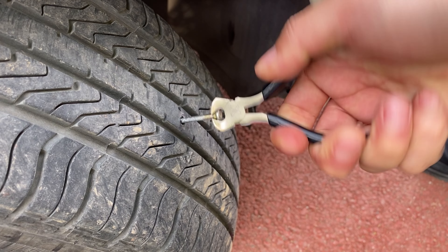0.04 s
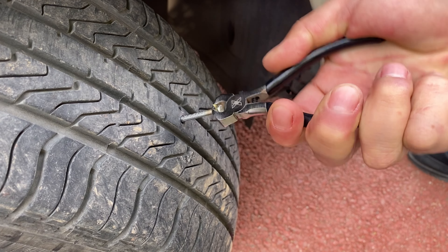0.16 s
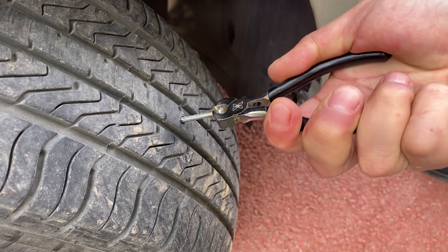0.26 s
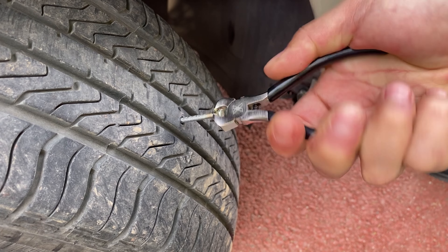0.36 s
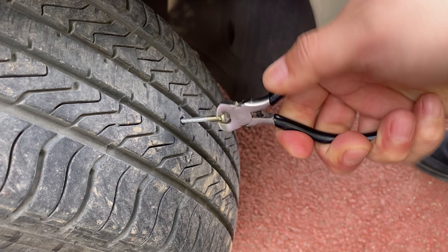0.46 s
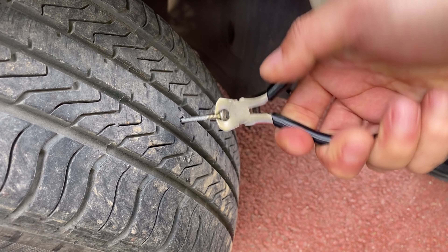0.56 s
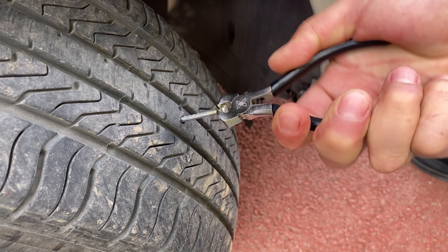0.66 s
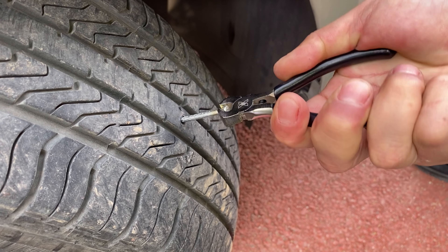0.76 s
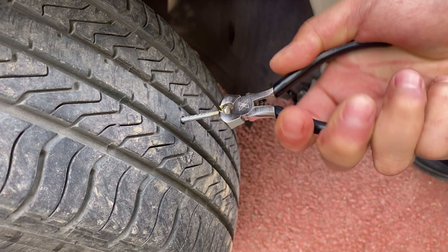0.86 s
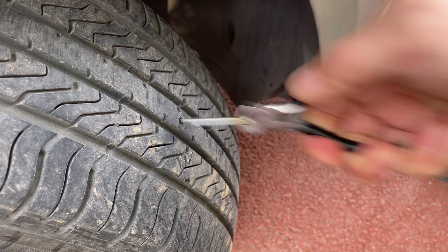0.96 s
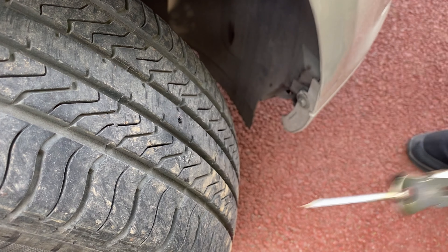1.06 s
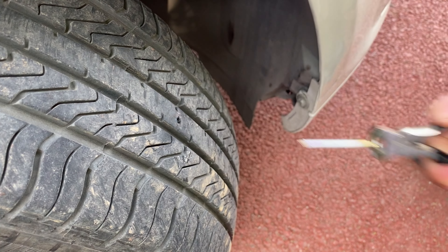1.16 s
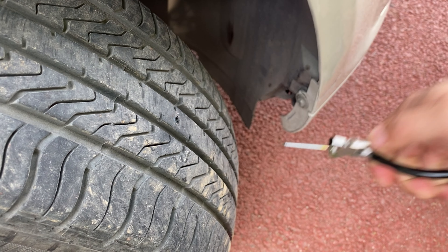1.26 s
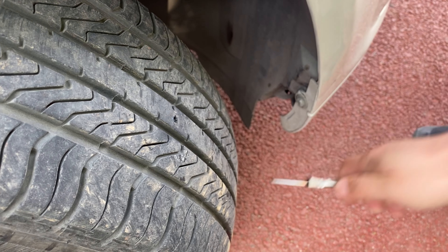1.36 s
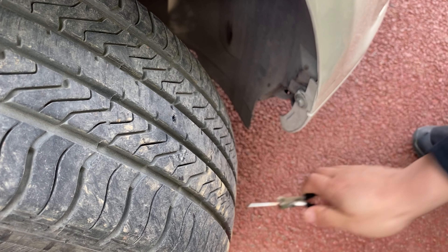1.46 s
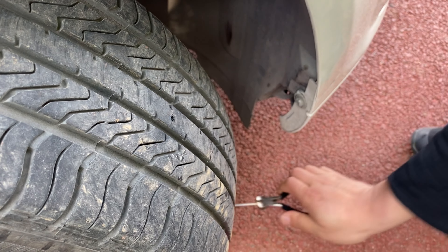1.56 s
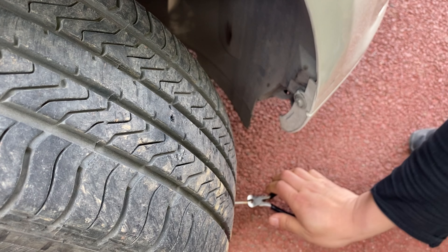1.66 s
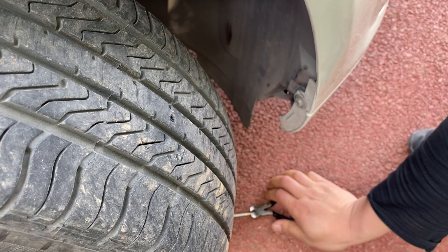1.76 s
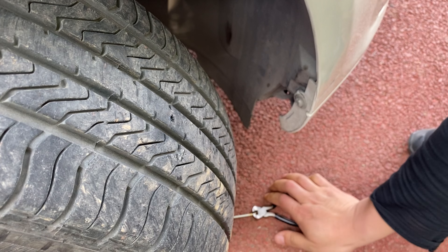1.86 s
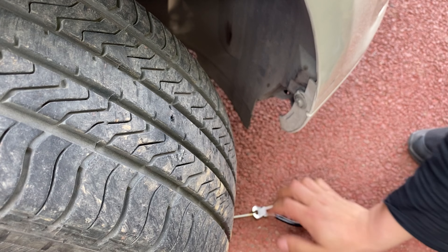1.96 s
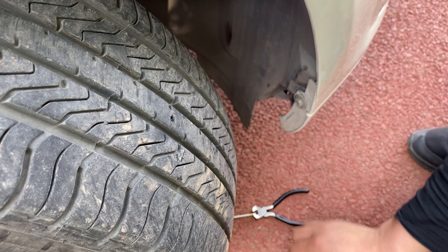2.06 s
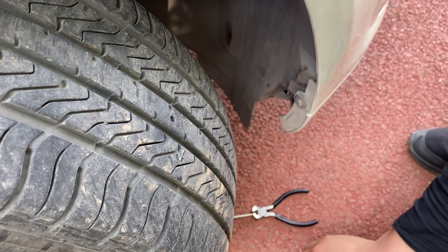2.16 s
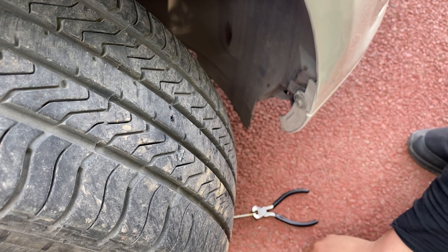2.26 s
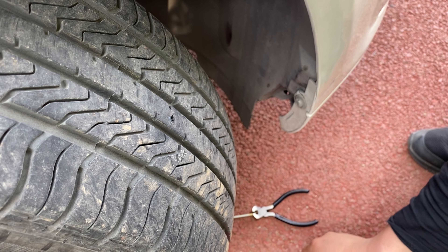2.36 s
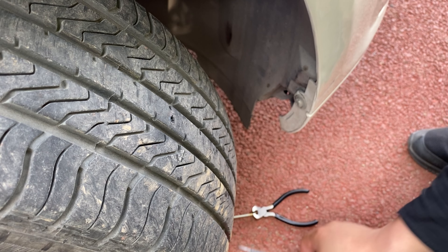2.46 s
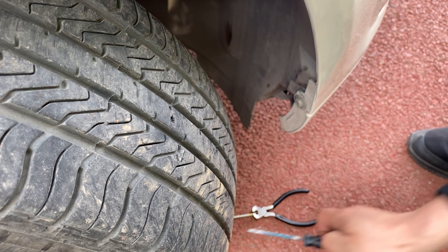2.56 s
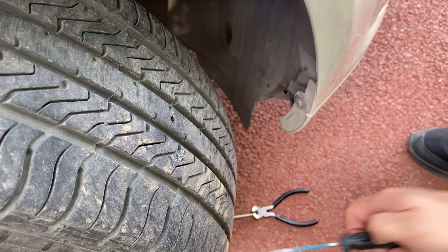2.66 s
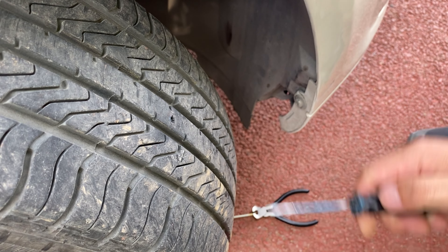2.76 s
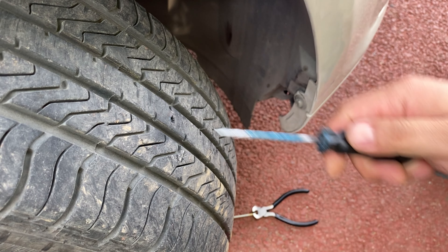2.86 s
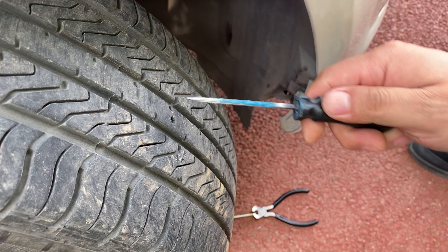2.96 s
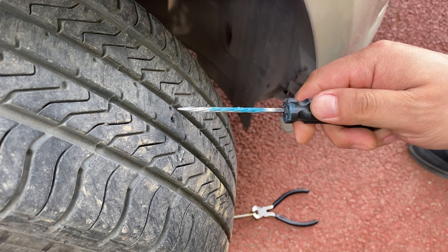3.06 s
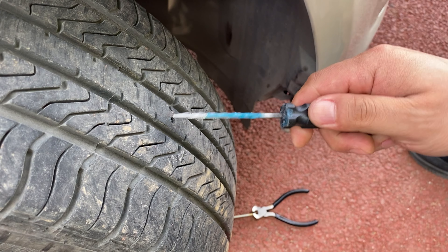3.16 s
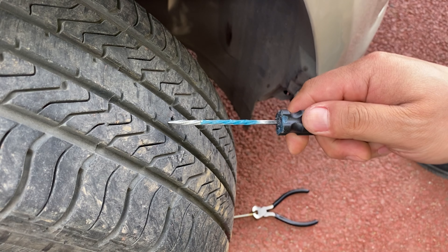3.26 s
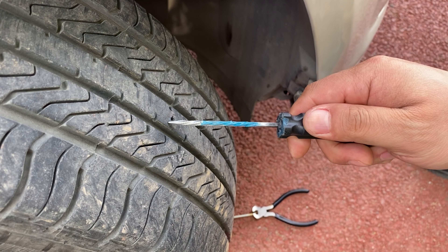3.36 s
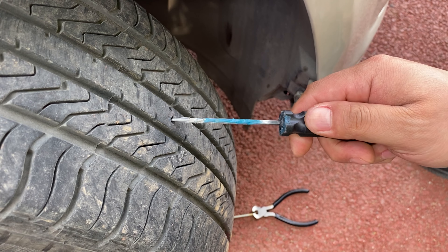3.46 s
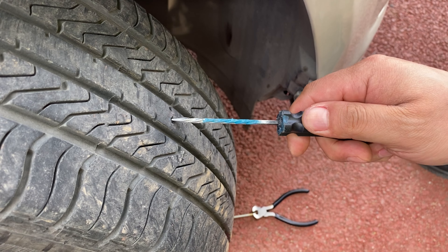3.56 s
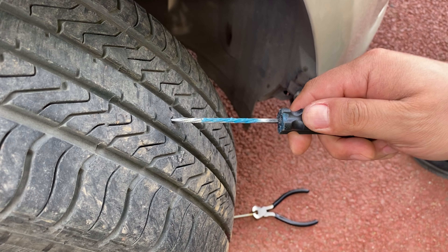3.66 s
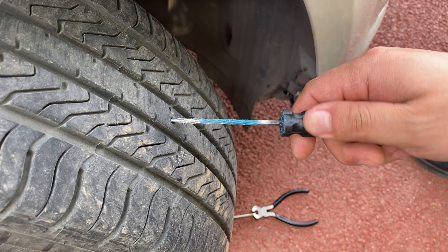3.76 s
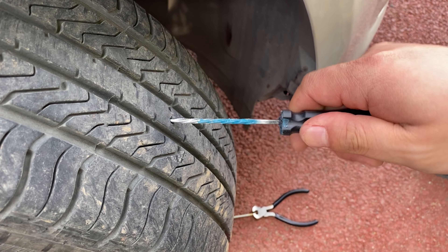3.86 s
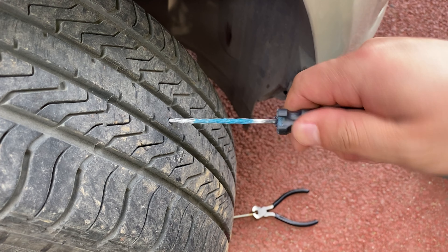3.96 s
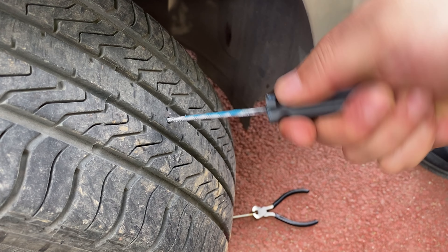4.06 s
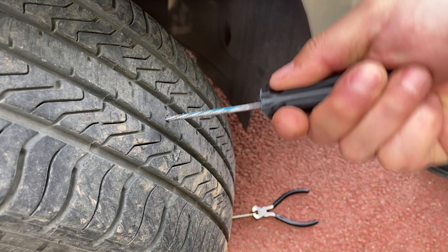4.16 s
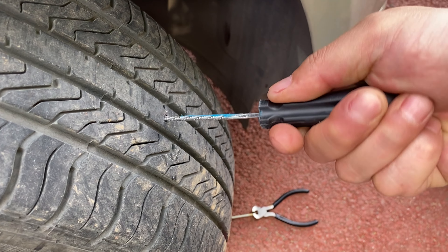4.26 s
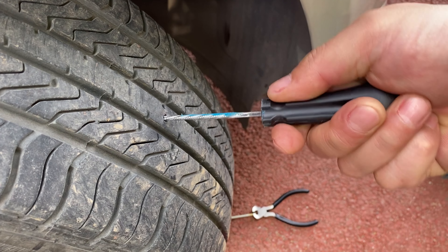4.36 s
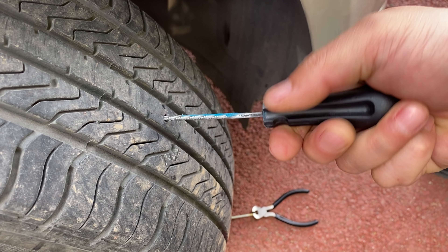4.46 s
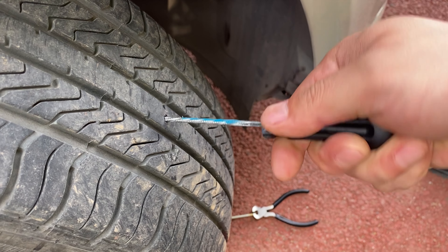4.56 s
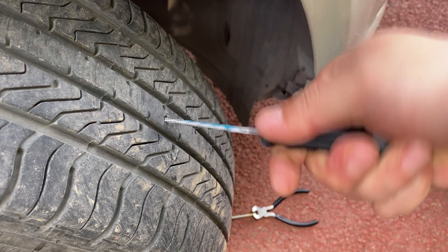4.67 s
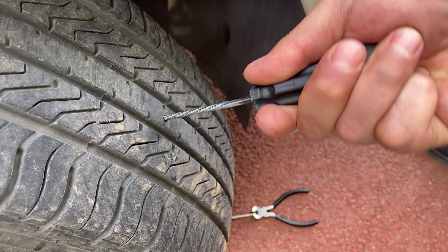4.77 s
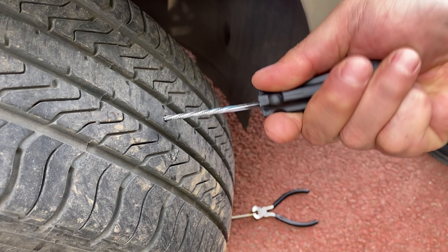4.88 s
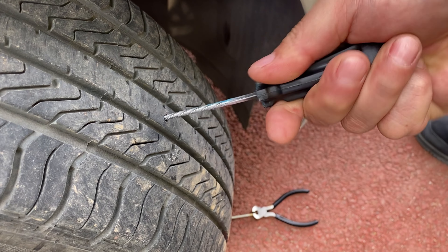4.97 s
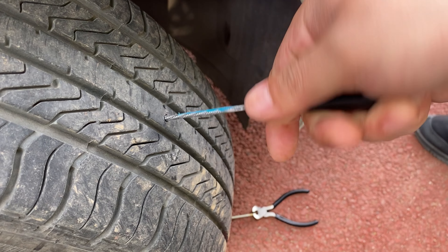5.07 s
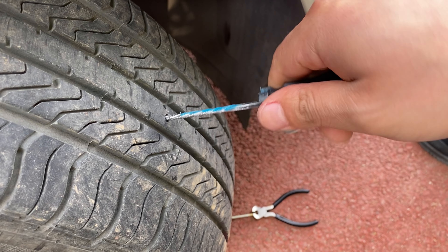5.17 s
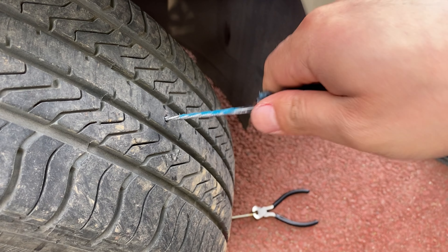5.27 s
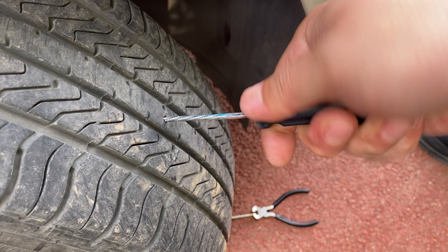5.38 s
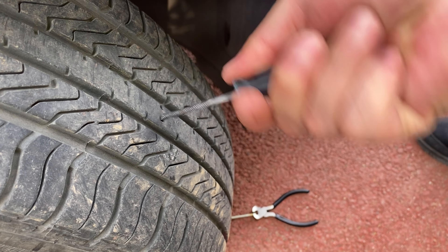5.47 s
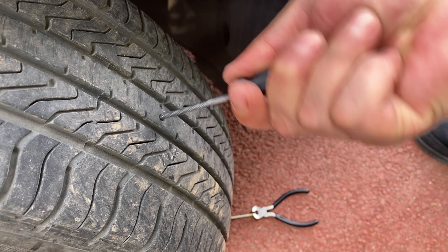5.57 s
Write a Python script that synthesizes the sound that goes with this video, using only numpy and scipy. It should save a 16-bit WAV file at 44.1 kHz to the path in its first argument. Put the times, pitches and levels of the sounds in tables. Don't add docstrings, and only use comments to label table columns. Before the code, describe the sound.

A tyre screw is worked loose with small steel clicks against quiet street rumble and faint bird and insect notes. A hard snap releases a piercing jet of air that slowly eases. A rasp swipes through it, making it flare, then pushes in; the hiss dies with gusts buffeting the close stereo microphone. Quiet twisting scrapes, clicks and little puffs of leaking air end it.

```python
import sys
import numpy as np
from scipy import signal
from scipy.fft import rfft, irfft
from scipy.io import wavfile

SR = 44100
rng = np.random.default_rng(int(sys.argv[2]) if len(sys.argv) > 2 else 0)


def decibels_to_gain(level_db):
    exponent = np.asarray(level_db, float) / 20
    return 10 ** exponent


def pcm_store(signal):
    levels = np.round(np.clip(np.atleast_2d(signal), -1, 1) * 32767)
    wavfile.write(sys.argv[1], SR, levels.astype(np.int16).T)


N = 247842

# time_s, level_db
STREET_DB = [(0, -54.5), (.7, -53), (1.1, -52.5), (1.8, -57), (3.8, -59), (4.3, -59), (4.7, -62.5),
             (5.2, -57), (5.62, -58.5)]
# freq_hz, correlation
STREET_CORRELATION = [(30, 1), (110, 0.86), (200, 0.79), (380, .5), (700, -0.49), (1300, 0.52),
                      (2400, 0.21), (4400, -0.15)]
# freq_hz, correlation
AIR_CORRELATION = [(200, 1), (500, 0.7), (800, 0.14), (1200, 0.64), (1800, .6), (2700, .65), (4200, 0.33),
                   (6000, 0.86)]


def unit(x):
    return x / np.sqrt(np.mean(x ** 2) + 1e-20)


def in_time(points):
    time_s, level_db = np.transpose(points)
    return np.interp(np.arange(N) / SR, time_s, level_db)


def at_hz(points, hz):
    point_hz, value = np.transpose(points)
    return np.interp(np.log(hz), np.log(point_hz), value)


def drift(rate_hz):
    pole = np.exp(-20 * np.pi * rate_hz / SR)
    noise = rng.standard_normal(N // 10 + 4002)
    slow = signal.lfilter([1], [1, -2 * pole, pole * pole], noise)[4000:]
    return np.interp(np.arange(N) / 10, np.arange(len(slow)), unit(slow))


def ring(drive, hz, t60_s):
    r, w = decibels_to_gain(-60 / (t60_s * SR)), 2 * np.pi * hz / SR
    return signal.lfilter([0, np.sin(w)], [1, -2 * r * np.cos(w), r * r], drive + 1e-18)


def decay(clicks, t60_s):
    return signal.lfilter([1], [1, -decibels_to_gain(-60 / (t60_s * SR))], clicks + 1e-18)


def coloured(spectrum, correlation):
    hz = np.maximum(np.arange(N // 2 + 1) * SR / N, 1)
    mid, side = rfft(rng.standard_normal((2, N)))
    alike = np.clip(at_hz(correlation, hz), -1, 1)
    inside = (hz > spectrum[0][0]) & (hz < spectrum[-1][0])
    pair = np.sqrt(1 + alike) * mid + np.sqrt(1 - alike) * side * [[1], [-1]]
    return unit(irfft(pair * decibels_to_gain(at_hz(spectrum, hz)) * inside, N))


def swell(start_s, end_s, edge_s):
    t = np.arange(N) / SR
    return np.clip(np.minimum(t - start_s, end_s - t) / edge_s, 0, 1)


def street():
    # freq_hz, density_db
    rumble_spectrum = [(12, -45), (20, -29.5), (42, -0.5), (65, 4), (137, -4.5), (167, -13), (231, -30.5),
                       (285, -22), (320, -46.5), (420, -64), (700, -120)]
    # freq_hz, density_db
    wash_spectrum = [(120, -20), (200, -2), (282, -7), (337, -11), (730, -12.5), (2260, -32.5),
                     (3530, -35.5), (4680, -49), (7000, -45.5), (9100, -65), (15400, -120)]
    # start_s, end_s, edge_s, change_db
    lull = (4.35, 4.9, .07, -10.5)
    # time_s, rise_db, half_length_s
    rumble_swells = [(.04, 4, 0.031), (0.244, 5.5, 0.11), (0.414, 4, 0.17), (0.727, 7.5, 0.089),
                     (1.35, 2.5, 0.043), (1.49, 4.5, 0.056), (1.806, 15, 0.16), (1.993, 5, 0.1),
                     (2.2, 6, 0.18), (2.328, 6.5, 0.086), (2.49, 12, 0.14), (2.834, 1.5, 0.065),
                     (3.331, 6, 0.18), (3.65, 6.5, 0.097), (4.309, 0.5, 0.063), (4.719, 9, .09),
                     (4.87, 4.5, 0.091), (5.004, 3, .1), (5.147, 2.5, .08), (5.49, 6, 0.058),
                     (5.58, 1, 0.066)]
    rumble_over_wash_db = 10
    calmer_s, calmer_db = 4.12, -3.5

    start_s, end_s, edge_s, lull_db = lull
    wash_db = in_time(STREET_DB)
    rumble_db = wash_db + rumble_over_wash_db
    rumble_db = rumble_db + lull_db * swell(start_s, end_s, edge_s)
    rumble_db = rumble_db + calmer_db * swell(calmer_s, N, edge_s)
    for time_s, rise_db, half_s in rumble_swells:
        rumble_db = rumble_db + rise_db * swell(time_s - half_s, time_s + half_s, half_s)
    rumble = decibels_to_gain(rumble_db + 2.04 * drift(15)) * coloured(rumble_spectrum, STREET_CORRELATION)
    wash = decibels_to_gain(wash_db - 1.0 + 0.7 * drift(12)) * coloured(wash_spectrum, STREET_CORRELATION)
    return rumble + wash


def hum():
    # freq_hz, level_db
    hum_lines = [(290, -64.5), (740, -69), (1150, -75.5), (1700, -84), (2200, -86)]
    out = np.zeros((2, N))
    for hz, level_db in hum_lines:
        out += decibels_to_gain(level_db) * unit(ring(rng.standard_normal((2, N)), hz, 0.3))
    return decibels_to_gain(in_time(STREET_DB) + 55) * out


def songs():
    # start_s, end_s, level_db, first_hz, last_hz
    calls = [
        (0.113, 0.693, -77, 8400, 7700),
        (.38, 0.462, -86, 7100, 6900),
        (.04, 0.13, -77, 4000, 3750),
        (0.201, 0.328, -79, 3450, 3900),
        (.77, 0.803, -68, 3200, 3090),
        (0.798, 0.842, -75, 4100, 4200),
        (4.098, 4.3, -83, 7970, 7500),
        (4.136, 4.392, -78, 1714, 1684),
        (5.25, 5.358, -80, 8300, 8200),
    ]
    t, out = np.arange(N) / SR, np.zeros(N)
    warble, throb = 0.031 * drift(228), decibels_to_gain(3.5 * drift(50))
    for start_s, end_s, level_db, first_hz, last_hz in calls:
        span = slice(int(start_s * SR), int(end_s * SR))
        hz = np.interp(t[span], [start_s, end_s], [first_hz, last_hz]) * (1 + warble[span])
        tone = np.sin(2 * np.pi * np.cumsum(hz) / SR)
        out[span] += decibels_to_gain(level_db) * swell(start_s, end_s, 0.0036)[span] * throb[span] * tone
    return out


def flow():
    # time_s, opening_db
    plug = [
        (3.6, 0),
        (3.648, -2.5),
        (3.734, -17.5),
        (3.896, -15),
        (4.016, -36),
        (4.098, -69),
        (4.2, -90),
    ]
    # start_s, end_s, level_db, change_db
    leaks = [
        (-.02, 0.368, -85, -14),
        (0.36, 1.02, -83, 4),
        (4.373, 4.448, -71, 2.5),
        (4.448, 4.505, -78.5, 5),
        (4.555, 4.649, -67.5, -13),
        (4.64, 4.788, -74, 12),
        (4.777, 4.994, -60.5, -5),
        (4.974, 5.386, -68, -5),
        (5.377, 5.552, -77.5, 6.5),
        (5.548, 5.616, -77.5, -5.5),
    ]
    open_s, open_rise_s, jet_db = 1.012, 0.010, -30.5
    sag_db, sag_s = 5, 0.85
    surge_top_db, surge_eddy_db, surge_s = -25.5, -23, 0.011
    hand_db, hand_gone_s, hand_edge_s = 2.5, 1.545, 0.035
    cross_db, cross_s, cross_half_s = 10.3, 3.21, 0.05
    eddy_db, eddy_grows_s = -14.5, 0.045
    leak_edge_s, leak_eddy_db = 0.015, -3.5
    seep_top_db, seep_eddy_db = -97.5, -91.5

    t = np.arange(N) / SR
    after_s = np.maximum(t - open_s, 0)
    opened = np.minimum(after_s / open_rise_s, 1) ** 2
    level_db = jet_db + sag_db * np.exp(-after_s / sag_s) + in_time(plug)
    level_db = level_db + hand_db * swell(0, hand_gone_s, hand_edge_s)
    level_db = level_db + cross_db * swell(cross_s - cross_half_s, cross_s + cross_half_s, cross_half_s)
    steady = opened * decibels_to_gain(level_db)
    surge = opened * np.exp(-np.maximum(after_s - open_rise_s, 0) / surge_s)
    leak = np.zeros(N)
    for start_s, end_s, first_db, change_db in leaks:
        leak_db = np.interp(t, [start_s, end_s], [first_db, first_db + change_db])
        leak += swell(start_s, end_s, leak_edge_s) * decibels_to_gain(leak_db)
    formed = decibels_to_gain(eddy_db) * np.minimum(after_s / eddy_grows_s, 1) ** 2
    top = steady + decibels_to_gain(surge_top_db) * surge + leak + decibels_to_gain(seep_top_db)
    eddies = formed * steady + decibels_to_gain(surge_eddy_db) * surge + decibels_to_gain(leak_eddy_db) * leak + decibels_to_gain(seep_eddy_db)
    return top, eddies


def jet():
    # freq_hz, density_db
    top_spectrum = [(4000, -26), (5500, -14), (6500, -9.5), (7300, -6), (9000, -5), (11500, -3.5),
                    (13900, -1), (14600, 0), (15200, -1), (15700, -6), (17000, -1)]
    # freq_hz, density_db
    eddy_spectrum = [(250, -10), (500, -10.5), (1000, -8.5), (1700, -6.5), (2400, -4), (2950, -0.5),
                     (3200, -4), (3600, 0.5), (3950, -4.5), (4400, -0.5), (5200, -2.5), (6500, -3),
                     (8000, -9)]
    # left_lag_s, right_lag_s, level_db, wander_s
    near_echoes = [
        (.0005, .0004, -24, 0.000044),
        (.0013, 0.00053, -33.5, 0.000066),
        (.0032, .00315, -18.5, .0001),
    ]

    top_gain, eddy_gain = flow()
    flutter_db = 0.12 * drift(27) + 0.32 * drift(350)
    eddy_flutter_db = 0.34 * flutter_db + 0.52 * drift(42)
    top = top_gain * decibels_to_gain(5 + flutter_db) * coloured(top_spectrum, AIR_CORRELATION)
    eddies = eddy_gain * decibels_to_gain(1.5 + eddy_flutter_db) * coloured(eddy_spectrum, AIR_CORRELATION)
    direct = top + eddies
    out = direct.copy()
    for left_lag_s, right_lag_s, level_db, wander_s in near_echoes:
        moved = np.arange(N) - wander_s * SR * drift(0.87)
        for port, lag_s in enumerate((left_lag_s, right_lag_s)):
            out[port] += decibels_to_gain(level_db) * np.interp(moved - lag_s * SR, np.arange(N), direct[port])
    return out


def ticks():
    # time_s, peak_db, dull_part_db
    tick_events = [(0.1694, -63, -3), (0.2077, -56, -5), (0.3877, -54, -10), (0.4314, -68, 0),
                   (0.4454, -46, -17), (0.693, -47.5, -8), (0.789, -34, -14), (0.8639, -49, -14),
                   (0.9307, -28, -8), (0.9443, -19, -8), (0.966, -60, 13), (0.9789, -41, -4),
                   (0.9866, -40, 0), (0.9984, -12, -10), (4.4394, -57, -6), (4.569, -51.5, -15.5),
                   (4.6055, -49.5, -11), (5.0305, -43, -12), (5.1294, -48, -6), (5.4349, -44, -12),
                   (5.5022, -44, -5), (4.459, -49, -14), (5.362, -55, -11), (5.584, -56.5, -15)]
    # freq_hz, level_db, t60_s
    steel_modes = [(1500, -9.5, 0.0082), (3600, 1, 0.003), (4340, 1.5, 0.0034), (7500, -8.5, .005),
                   (9200, 1, 0.0041), (12400, -4.5, 0.0069), (13900, -4, .004)]

    time_s, peak_db, dull_db = np.transpose(tick_events)
    at = np.round(time_s * SR).astype(int)

    def clicks(level_db):
        train = np.zeros(N)
        train[at] = decibels_to_gain(level_db)
        return train

    modes = np.zeros(N)
    for hz, level_db, t60_s in steel_modes:
        chance_db = rng.normal(0, 2.9, len(at))
        mode_db = peak_db + dull_db * (hz < 5000) + level_db - 5.5 + chance_db
        modes += ring(clicks(mode_db), hz, t60_s)
    crack = decibels_to_gain(-10.0) * decay(clicks(peak_db), 0.006)
    puff = decibels_to_gain(-23.0) * decay(clicks(peak_db), 0.043)
    knock = decibels_to_gain(1.5) * decay(clicks(peak_db + dull_db), 0.046)
    highpass = signal.butter(1, 2500, "high", fs=SR, output="sos")
    bright = signal.sosfilt(highpass, rng.standard_normal(N))
    bandpass = signal.butter(1, [900, 2600], "band", fs=SR, output="sos")
    dull = signal.sosfilt(bandpass, rng.standard_normal((2, N)))
    return modes + (crack + puff) * bright + knock * dull


def pop():
    # freq_hz, level_db, t60_s
    carcass_modes = [(93.5, 2, 0.074), (217, -5, 0.034), (560, -1.5, 0.04), (1030, -8.5, 0.041),
                     (1370, 8, .02), (1930, 1.5, 0.043), (2400, 4, 0.018)]
    rush_spectrum = [(200, -3.5), (400, -2), (1300, -6), (3000, -9.5), (7000, -4.0)]  # freq_hz, density_db
    thump_spectrum = [(40, -3), (90, -1), (150, -0.5), (300, -18.5)]  # freq_hz, density_db
    pop_s, pop_db = 1.016, -25

    t = np.maximum(np.arange(N) / SR - pop_s, 0)
    burst = t / 0.007 * np.exp(1 - t / 0.0049)
    body = np.zeros(N)
    for hz, level_db, t60_s in carcass_modes:
        body += decibels_to_gain(level_db - 22.5) * ring(burst * rng.standard_normal(N), hz, t60_s)
    rush = t / 0.0079 * np.exp(1 - t / 0.01) * coloured(rush_spectrum, AIR_CORRELATION)
    thump = t / 0.015 * np.exp(1 - t / 0.016) * coloured(thump_spectrum, STREET_CORRELATION)
    return decibels_to_gain(pop_db) * (body + decibels_to_gain(-6.0) * rush + decibels_to_gain(-6.0) * thump)


def buffet():
    # time_s, peak_db, freq_hz
    air_lumps = [(3.913, -37.5, 187), (3.935, -25, 59.6), (3.957, -29.5, 79.5), (3.97, -24, 215),
                 (3.975, -51, 575), (3.979, -31, 346), (3.982, -15.5, 166), (3.992, -22, 127),
                 (4.016, -20.5, 70.4), (4.024, -37.5, 266), (4.028, -27, 139), (4.05, -34, 194),
                 (4.076, -25, 86), (4.093, -27.5, 66.2)]
    right_lead_s = 0.0005
    out, span = np.zeros((2, N)), slice(int(3.8 * SR), int(4.2 * SR))
    t = np.arange(N)[span] / SR + np.array([[0], [right_lead_s]])
    for time_s, peak_db, hz in air_lumps:
        cycles = (t - time_s) * hz
        out[:, span] += decibels_to_gain(peak_db) * np.exp(-cycles ** 2) * np.sin(2 * np.pi * cycles)
    return out


def scrapes():
    # start_s, end_s, level_db, centre_hz
    strokes = [(4.418, 4.467, -71.5, 3600), (4.44, 4.502, -71.5, 2600), (4.59, 4.619, -73, 3600),
               (4.659, 4.722, -68, 1300), (4.766, 4.85, -58.5, 875), (4.786, 4.845, -55, 470),
               (4.85, 5.005, -75, 3320), (5.087, 5.16, -65, 2400), (5.156, 5.225, -68.5, 3500),
               (5.331, 5.46, -69.5, 3470), (5.115, 5.151, -63, 4700), (5.452, 5.531, -71.5, 2530)]
    slips_per_s = 1500
    struck = rng.random((3, N)) < slips_per_s / SR
    height = decibels_to_gain(6.0 * np.minimum(rng.exponential(1, (3, N)), 4))
    slips = struck * height * rng.choice([-1, 1], (3, N))
    slips = slips[0] + 1.4 * slips[1:]
    out = np.zeros((2, N))
    for start_s, end_s, level_db, hz in strokes:
        span = slice(int(start_s * SR), int(end_s * SR))
        band = signal.butter(2, [hz / 1.57, hz * 1.27], "band", fs=SR, output="sos")
        rubber = unit(signal.sosfilt(band, slips[:, span]))
        out[:, span] += decibels_to_gain(level_db) * swell(start_s, end_s, 0.014)[span] * rubber
    return out


def scene():
    return street() + hum() + songs() + jet() + ticks() + pop() + buffet() + scrapes()


def roll_off(x):
    return signal.sosfilt(signal.butter(12, 16350, fs=SR, output="sos"), x)


def record(dry):
    # freq_hz, right_over_left_db
    right_over_left = [(60, -0.2), (200, 2), (800, 3), (1800, 2), (3000, 4.5), (5000, 7), (6500, 3)]
    join_hz, join_width_hz, top_hz = 6900, 150, 15800
    port_lag_s, port_turn_rad, low_turn_rad = 0.00015786, 0.42, 0.13
    self_noise_db = -85.5
    right_own_db = -13

    hz = np.maximum(np.arange(N // 2 + 1) * SR / N, 1)
    rounded = 0.9 * np.tanh(dry / 0.9)
    pair = rfft(rounded + decibels_to_gain(self_noise_db) * rng.standard_normal((2, N)))
    sides = np.array([[-0.5], [0.5]])
    low = pair * decibels_to_gain(sides * at_hz(right_over_left, hz)) * np.exp(1j * sides * low_turn_rad)
    turn = 2 * np.pi * (hz * port_lag_s - 1) + port_turn_rad
    turn = np.minimum(turn, 3 * np.pi)
    high = (pair[0] + decibels_to_gain(right_own_db) * (pair - pair[0])) * np.exp(-1j * sides * turn)
    share = 0.5 + 0.5 * np.tanh((hz - join_hz) / join_width_hz)
    joined = ((1 - share) * low + share * high) / (1 + (hz / top_hz) ** 900)
    return roll_off(irfft(joined, N))


dry = scene()
out = record(dry)
pcm_store(out)
```